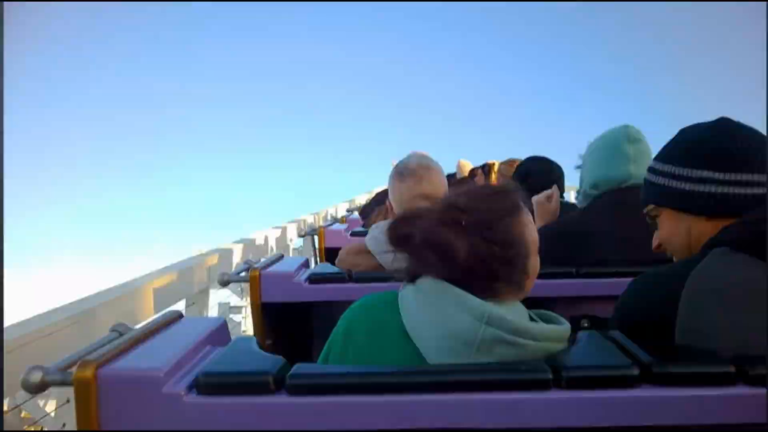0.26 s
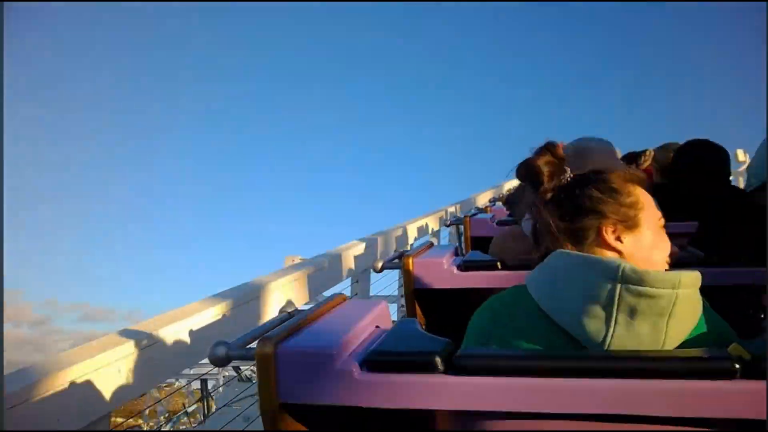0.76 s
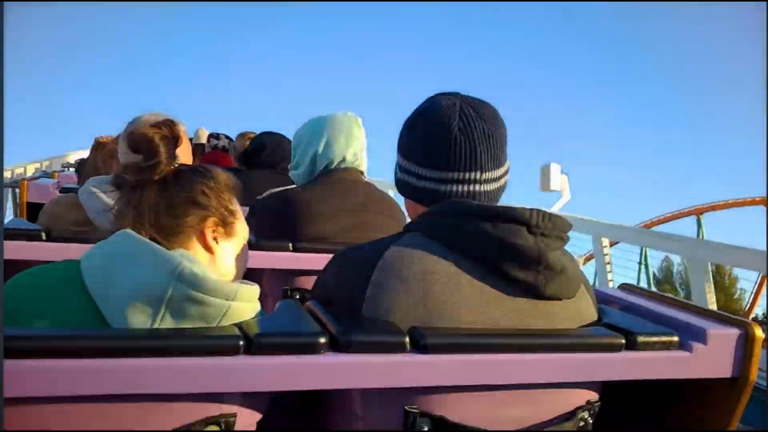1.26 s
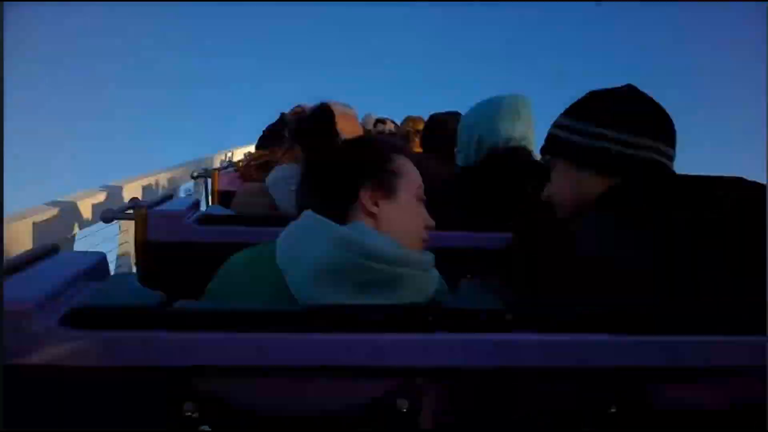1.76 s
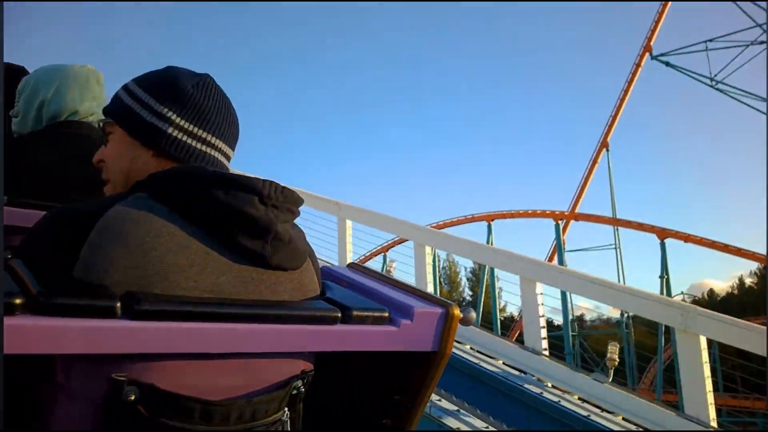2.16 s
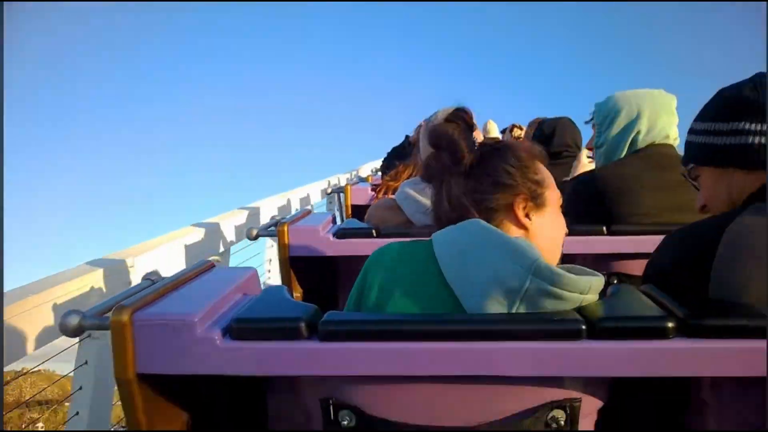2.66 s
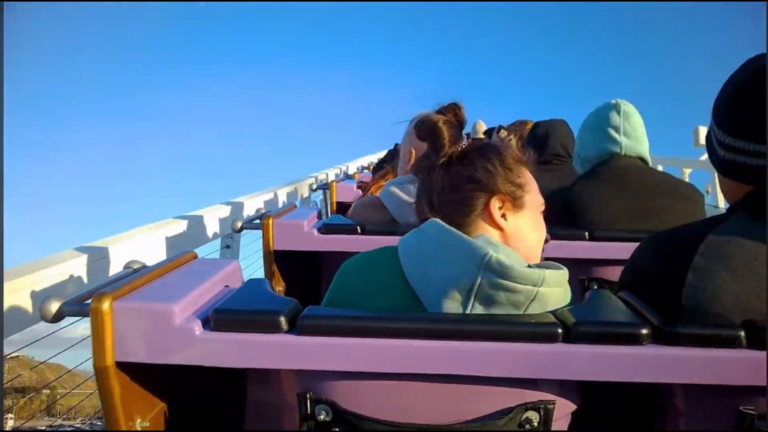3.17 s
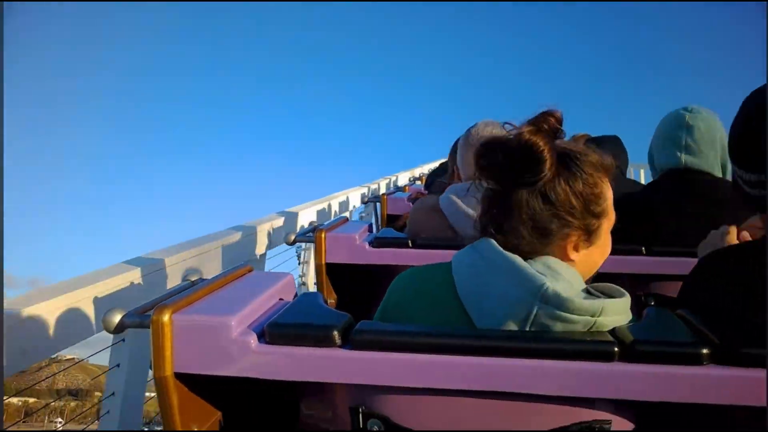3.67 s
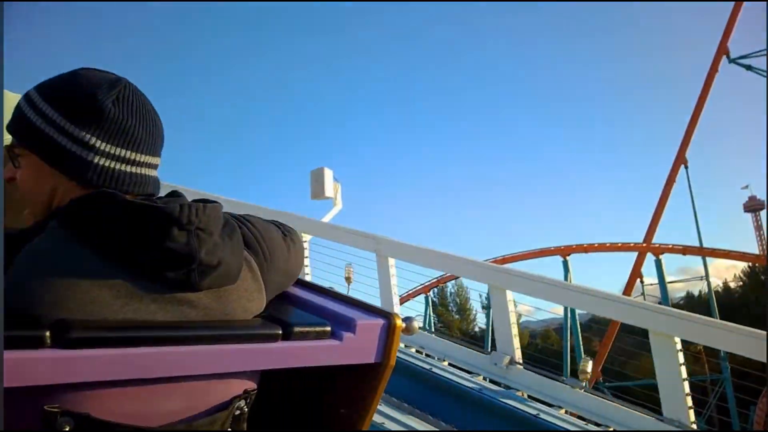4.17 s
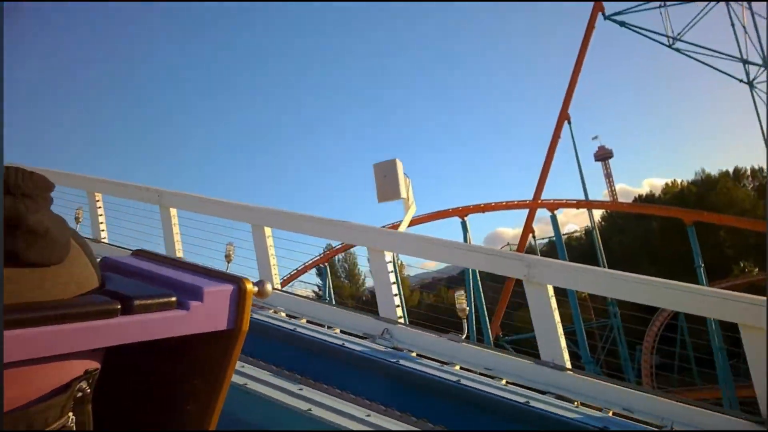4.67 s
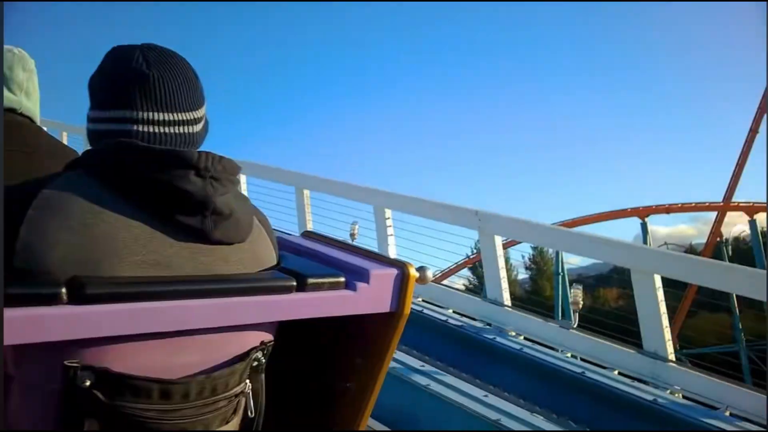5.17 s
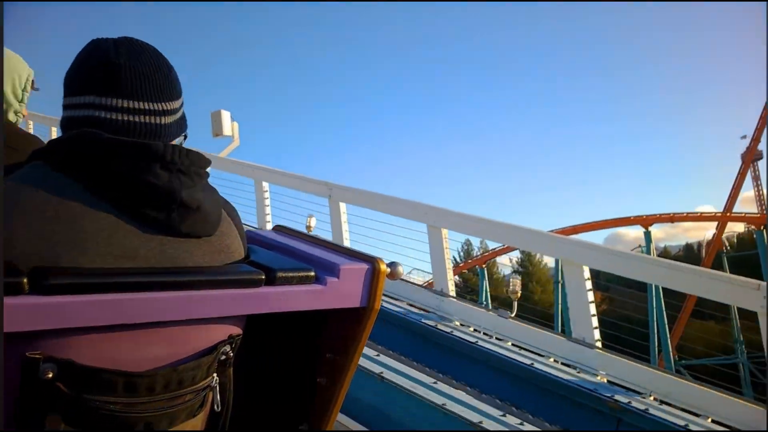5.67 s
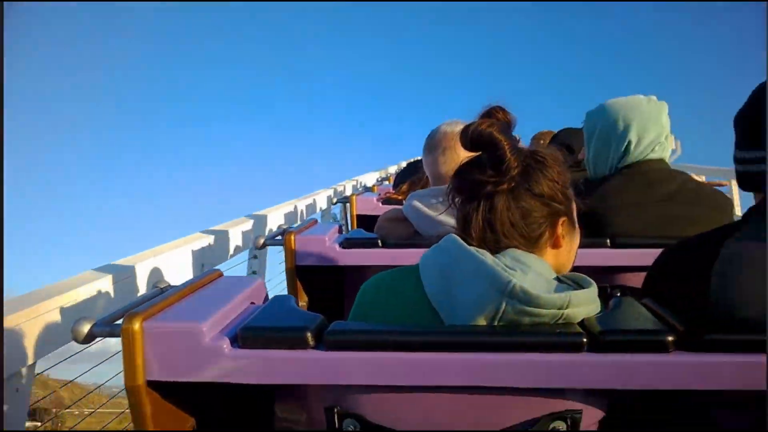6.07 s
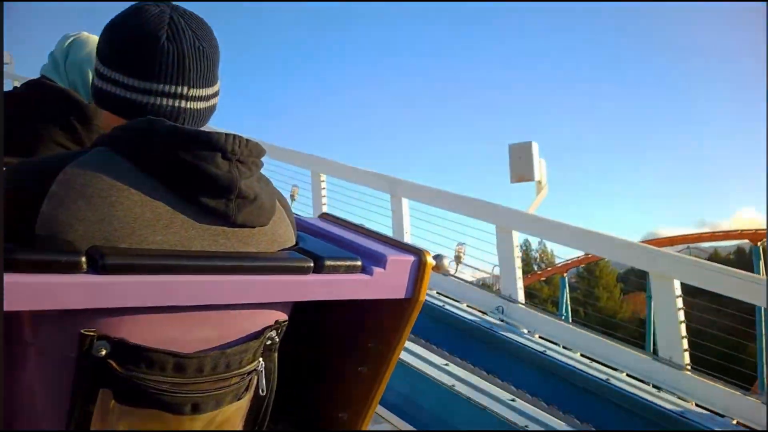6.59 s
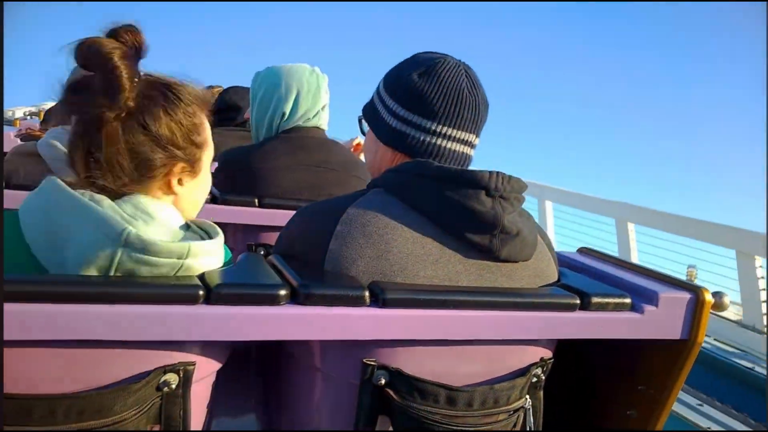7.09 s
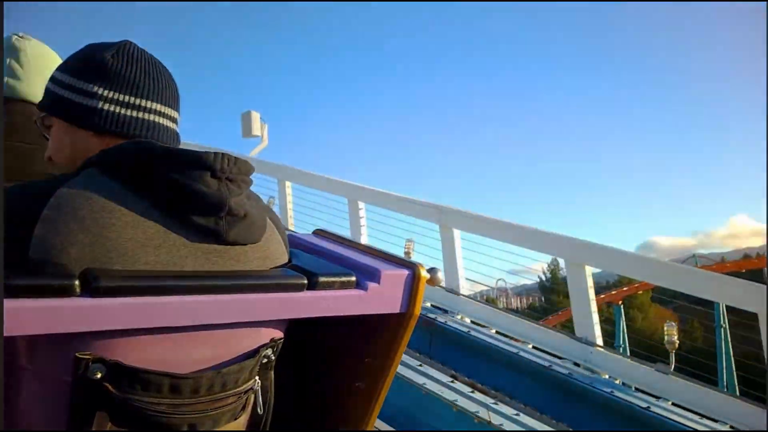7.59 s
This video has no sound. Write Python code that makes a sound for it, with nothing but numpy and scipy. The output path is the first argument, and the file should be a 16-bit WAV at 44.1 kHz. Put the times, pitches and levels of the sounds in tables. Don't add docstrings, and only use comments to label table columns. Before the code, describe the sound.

Harsh bright ratcheting of steel on steel as a coaster train climbs, irregular at first, later even and rapid, with tiny rubber squeaks.

```python
import sys
import numpy as np
from scipy import signal
from scipy.io import wavfile
from scipy.ndimage import uniform_filter1d

SR = 44100
rng = np.random.default_rng(int(sys.argv[2]) if len(sys.argv) > 2 else 0)


def waveform_to_disk(signal):
    frames = np.transpose(np.atleast_2d(signal))
    scaled = np.clip(frames, -1, 1) * 32767
    samples = np.round(scaled).astype(np.int16)
    wavfile.write(sys.argv[1], SR, samples)


def field_ratio(decibels):
    return 10 ** (np.asarray(decibels, dtype=float) / 20)


N = 345744

LOCKED_S, TEETH_PER_S, LOCKED_COUNT = 4.6933, 46.545, 147

# frequency in Hz, level in dB per Hz.
STEEL_COLOUR = [(500, -12), (707, -7), (1410, -4.5), (1900, -3.5), (2780, -5), (3250, -3.5), (6490, -3.5),
                (7200, -3), (8710, -2), (9840, -4.5), (11500, -14.5), (13100, -14.5), (16500, -5.5)]
# centre in Hz, width in Hz, height in dB.
PLATE_RESONANCES = [(2070, 490, 1), (2476, 155, 4.1), (3200, 810, 5.2), (4166, 220, 6.4), (4760, 190, 4.6),
                    (5160, 170, 4.2), (5630, 210, 3.2), (6300, 210, 3.7), (6540, 260, 3.3),
                    (8600, 200, 1.2), (8980, 150, 4.9), (9440, 150, 2.4), (9830, 220, 3.3),
                    (10720, 160, 2.9), (11060, 150, 4.8), (12000, 310, 4), (12900, 340, 3.4),
                    (14000, 310, 2.4), (16800, 160, 1.2)]
# frequency in Hz, time to fade by 60 dB in seconds.
RING_TIME = [(300, 0.037), (1000, 0.16), (2500, 0.12), (5000, 0.034), (9000, 0.036), (15000, 0.03)]
# frequency in Hz, time in seconds.
RATTLE_RISE_TIME = [(500, 0.002), (2000, 0.0031), (4000, 0.00044), (7000, 0.00039), (15000, 0.00037)]
# frequency in Hz, level in dB.
CONTACT_TICK = [(1000, 7.5), (3000, 9), (6000, -4.5), (9000, 26), (15000, 6)]

# time in seconds, level in dB.
ROAR_LEVEL = [(0.0, -18.5), (0.8, -23.5), (1.3, -20.5), (1.6, -21.5), (2.4, -24), (3.2, -21.5), (3.7, -22),
              (4.3, -20.5), (4.5, -26), (4.75, -20.5), (5.3, -20.5), (6.0, -18), (7.84, -19)]
# frequency in Hz, level in dB per Hz.
ROAR_COLOUR = [(500, -2), (700, -4), (1440, -7.5), (1850, 2.5), (2770, -18), (3210, -0.4), (6460, -5.5),
               (8870, -6), (11700, -18), (16500, -33)]
# centre in Hz, width in Hz.
RAIL_RESONANCES = [(1920, 140), (3300, 810)]

# start in seconds, number of strikes,
# speeding up (-0.5 to 0.5), long-short limp (-0.4 to 0.4).
BOUNCING_RUNS = [(0.0, 4, -0.5, 0.35), (0.0898, 3, -0.45, 0.3), (0.1696, 3, -0.3, 0.05),
                 (0.2439, 10, 0.3, 0), (0.4555, 3, 0.45, 0), (0.5068, 11, -0.35, -0.2),
                 (0.7168, 5, 0, -0.05), (0.858, 7, 0.15, 0), (1.0257, 4, -0.5, 0.2), (1.096, 5, -0.5, 0),
                 (1.192, 7, 0.15, 0), (1.3844, 4, -0.45, 0.25), (1.4741, 4, 0.5, -0.05),
                 (1.556, 4, -0.5, -0.05), (1.6368, 6, 0, -0.1), (1.763, 7, -0.45, 0),
                 (1.9027, 6, -0.4, 0.15), (2.0294, 3, 0.45, -0.25), (2.0828, 5, 0.4, -0.05),
                 (2.1681, 4, -0.15, -0.05), (2.2379, 8, -0.1, 0), (2.4474, 4, 0, 0.05),
                 (2.5412, 6, -0.4, -0.1), (2.6714, 7, 0.05, 0.1), (2.8156, 6, 0.45, -0.05),
                 (2.9393, 4, 0.5, -0.2), (3.0246, 7, 0.1, 0.05), (3.1932, 5, 0.2, 0.2),
                 (3.314, 4, -0.45, -0.15), (3.3788, 4, 0.25, 0)]
# start in seconds, number of strikes,
# speeding up, limp.
LEAPING_RUNS = [(3.4643, 2, 0, 0.1), (3.534, 4, 0.25, -0.05), (3.6238, 5, 0.1, -0.1), (3.7724, 4, -0.1, 0),
                (3.8597, 3, 0.05, 0.05), (3.9502, 2, 0, 0.4), (4.0119, 5, 0.1, 0.05), (4.168, 3, 0.15, 0),
                (4.2628, 2, 0, 0.05), (4.3242, 2, 0, 0), (4.3606, 3, 0.1, 0.35), (4.4229, 2, 0, 0),
                (4.4853, 5, 0.1, 0.15), (4.623, 3, 0.2, 0)]
# time in seconds, rebound level in dB.
REBOUND_LEVEL = [(0.0, -19), (0.9, -21), (1.25, -15.5), (1.42, -25), (2.4, -19.5), (3.1, -19), (3.9, -18),
                 (4.1, -16), (4.45, -24.5)]

# start in seconds, length in seconds, from Hz, to Hz, level in dB.
THIN_SQUEAKS = [(2.222, .04, 1750, 1920, -30), (2.247, .019, 3760, 3650, -26),
                (2.28, .022, 3750, 2950, -26), (2.777, .014, 1750, 2020, -28),
                (2.79, .04, 2060, 1960, -28.5), (2.798, .034, 3340, 3220, -26.5),
                (5.945, .04, 3100, 3420, -28), (4.092, .017, 7300, 9000, -28),
                (4.178, .012, 8000, 9200, -28), (4.211, .015, 9700, 9900, -28),
                (4.256, .03, 8500, 8300, -29)]
# start in seconds, length in seconds, from Hz, to Hz, level in dB.
REEDY_SQUEAKS = [
    (1.306, .038, 1780, 2070, -26),
    (3.41, .038, 1330, 1920, -26.5),
]
# start in seconds, length in
# seconds, from Hz, to Hz, level in dB.
BRIGHTER_SQUEAK = [
    (2.83, .027, 3220, 2600, -26),
]
# start in seconds, length in seconds, from Hz, to Hz, level in dB.
STRAIGHT_SQUEAK = [
    (4.759, .057, 740, 1190, -25.5),
]

# time in seconds, facing (1 car, -1 open air),
# leaning over the rail (0 to 1).
MIC_FACING = [
    (0.0, 1, 0),
    (0.7, 1, 0.21),
    (1.3, 0.27, 0.73),
    (2.8, 0.77, 0.94),
    (4.3, 0.15, 0.26),
    (5.2, -0.36, 0.28),
    (6.4, -1, 0),
    (7.1, -0.77, 0.55),
    (7.84, -0.79, 1),
]


def evened(x):
    return x / np.sqrt(np.mean(x ** 2) + 1e-20)


def read(points, hz):
    f, value = np.transpose(points)
    return np.interp(np.log(hz + 1), np.log(f + 1), value)


def bump(hz, centre_hz, width_hz):
    return 1 / (1 + (2 * (hz - centre_hz) / width_hz) ** 2)


def rings_db(hz):
    return sum(db * bump(hz, f, width) for f, width, db in PLATE_RESONANCES)


def coloured(x, gain_db):
    hz = np.abs(np.fft.fftfreq(4096, 1 / SR))
    log_gain = np.log(field_ratio(np.maximum(gain_db(hz), -100)))
    taps = np.fft.ifft(np.exp(np.conj(signal.hilbert(log_gain)))).real[:2048]
    return signal.oaconvolve(x, taps / np.linalg.norm(taps))[:N]


def roar():
    frames, hz = N // 128 + 5, np.fft.rfftfreq(512, 1 / SR)
    a, b, patches = rng.standard_normal((frames, 257, 3)).T
    patches = evened(uniform_filter1d(uniform_filter1d(patches, 5, 0), 12, 1))
    flutter = evened(uniform_filter1d(rng.standard_normal(frames), 4))
    colour_db = (read(ROAR_COLOUR, hz) + rings_db(hz))[:, None]
    z = (a + 1j * b) * field_ratio(colour_db + 1.3 * patches + 1.65 * flutter)
    wash = evened(signal.istft(z, nperseg=512, noverlap=384)[1][:N])
    level_db = np.interp(np.arange(N) / SR, *np.transpose(ROAR_LEVEL)) - 4.5
    return wash * field_ratio(level_db)


def squeaks():
    out = np.zeros(N)
    # squeaks, levels of tones 1-3 in dB, how much the glide flattens near its top
    kinds = [(THIN_SQUEAKS, (2, -15, -20), 1.7), (REEDY_SQUEAKS, (-11, 3, 0.5), 1.7),
             (BRIGHTER_SQUEAK, (2, -2, -20), 1.7), (STRAIGHT_SQUEAK, (-7.5, 2, -4), 1.25)]
    ends_db = -2.5
    for rows, tones_db, bow in kinds:
        for start, length, from_hz, to_hz, db in rows:
            u = np.linspace(0, 1, round(length * SR))
            off_top = u if from_hz > to_hz else 1 - u
            hz = max(from_hz, to_hz) - abs(from_hz - to_hz) * off_top ** bow
            turn = 2 * np.pi * np.cumsum(hz) / SR
            tone = sum(field_ratio(d) * np.sin((k + 1) * turn) for k, d in enumerate(tones_db))
            swell = field_ratio(db + ends_db * (2 * u - 1) ** 2) * signal.windows.tukey(len(u), .3)
            out[round(start * SR):][:len(u)] += np.sqrt(2) * tone * swell
    return out


def loose_strike_times():
    rows = BOUNCING_RUNS + LEAPING_RUNS
    ends = [row[0] for row in rows[1:]] + [LOCKED_S]
    out = []
    for (start, count, bend, limp), end in zip(rows, ends):
        k = np.arange(count)
        u = (k + limp * (k % 2)) / count
        out.append(start + (end - start) * (u + bend * u * (1 - u)))
    return np.concatenate(out)


def locked_strikes():
    late, hard = rng.standard_normal((LOCKED_COUNT, 2)).T
    s = LOCKED_S + np.arange(LOCKED_COUNT) / TEETH_PER_S + 0.00047 * late
    sway_s, sway_top_s = 1.23, 6.05
    sway_db = 0.3 * np.cos(2 * np.pi * (s - sway_top_s) / sway_s)
    return s, -10 + sway_db + 0.15 * hard


def strikes():
    locked_s, locked_db = locked_strikes()
    s = loose_strike_times()
    gap = np.diff(s, prepend=-1 / TEETH_PER_S)
    hard, soft, when = rng.standard_normal((len(s), 3)).T
    doublings = np.log2(gap * TEETH_PER_S)
    db = -9 + 2 * doublings + 0.5 * hard
    rebound_db = np.interp(s, *np.transpose(REBOUND_LEVEL)) + 4.5 * np.tanh(soft)
    rebound_s = np.abs(s - gap * (.55 + .13 * np.tanh(when)))
    s, db = np.r_[s, rebound_s, locked_s], np.r_[db, rebound_db, locked_db]
    lead_s = .0052 - .006 * np.r_[doublings, doublings, 0 * locked_s].clip(0)
    late, weak = rng.random((len(s), 2)).T
    graze_s = np.abs(s - lead_s + .009 * late)
    graze_db = db - 3.5 - 8.5 * weak
    return np.r_[s, graze_s], field_ratio(np.r_[db, graze_db])


def steel_body(count):
    hz, t, z = signal.stft(rng.standard_normal((count, 6000)), SR, nperseg=64)
    fade_db = -60 * t / read(RING_TIME, hz)[:, None]
    body = signal.istft(z * field_ratio(fade_db), SR, nperseg=64)[1]
    return body / np.linalg.norm(body, axis=1, keepdims=True)


def ringing(s, blow, spots):
    t = np.arange(800) / SR
    bounce = (1 - np.exp(-t / 0.00051)) * (3.7 * np.exp(-t / 0.0011) + 1 / (1 + (t / 0.0047) ** 4))
    scrape = rng.standard_normal(N)
    out = np.zeros(N)
    for k, body in enumerate(steel_body(count=spots)):
        at = np.round((s[k::spots] + 0.00068) * SR).astype(int)
        blows = np.bincount(at, blow[k::spots], N)[:N]
        push = signal.oaconvolve(blows, bounce)[:N] * scrape
        out += signal.oaconvolve(push, body)[:N]
    return out


def rattle(s, blow):
    frames, hz = N // 16 + 5, np.fft.rfftfreq(64, 1 / SR)
    t = np.arange(200) * 16 / SR
    build = 1 - np.exp(-t / read(RATTLE_RISE_TIME, hz)[:, None])
    hold_s = .004
    decay = field_ratio(-120 * np.maximum(t - hold_s, 0) / (1.75 * read(RING_TIME, hz)[:, None]))
    tick = field_ratio(2 * read(CONTACT_TICK, hz))[:, None] * np.exp(-t / 0.0029)
    at = np.round((s + 0.00097) * SR / 16).astype(int)
    blows = np.bincount(at, blow ** 2, frames)[None, :frames]
    power = np.abs(signal.oaconvolve(blows, build ** 2 * decay + tick, axes=1)[:, :frames])
    power /= power.mean(1, keepdims=True)
    a, b, grain = rng.standard_normal((frames, 33, 3)).T
    grain = evened(uniform_filter1d(uniform_filter1d(grain, 2, 0), 14, 1))
    power *= field_ratio(2 * 1.5 * grain)
    return signal.istft((a + 1j * b) * np.sqrt(power), nperseg=64, noverlap=48)[1][:N]


def pawl(spots):
    s, blow = strikes()
    steel = field_ratio(-7.5) * evened(ringing(s, blow, spots)) + field_ratio(-1.0) * evened(rattle(s, blow))
    return field_ratio(-17.5) * evened(coloured(steel, lambda hz: read(STEEL_COLOUR, hz) + rings_db(hz)))


def turned(x):
    hz, t, z = signal.stft(x, SR, nperseg=512)
    hz = hz[:, None]
    lower, upper = [bump(hz, *row) for row in RAIL_RESONANCES]
    car_db = 2.5 / (1 + (hz / 1550) ** 6) - 0.8 / (1 + (10500 / (hz + 1)) ** 8)
    car_db += -1.3 * lower + 1.2 * upper
    rail_db = 3 * lower - .6 * upper
    s, facing, rail = np.transpose(MIC_FACING)
    drift = uniform_filter1d(uniform_filter1d(rng.standard_normal(z.T.shape), 70, 0), 4, 1).T
    gain_db = car_db * np.interp(t, s, facing) + rail_db * np.interp(t, s, rail) + .7 * evened(drift)
    return signal.istft(z * field_ratio(gain_db), SR, nperseg=512)[1][:N]


def scene():
    return (turned(pawl(spots=8) + roar()) + squeaks())[None]


def top_cut(x):
    return signal.sosfilt(signal.butter(12, 16820, fs=SR, output="sos"), x)


def record(dry):
    cut = signal.sosfilt(signal.butter(7, 650 / (SR / 2), "high", output="sos"), dry)
    leak = signal.lfilter(*signal.butter(1, 250 / (SR / 2), "high"), dry)
    cut = 0.84 * cut + 0.13 * leak
    knee = 3.5
    limited = cut / (1 + np.abs(cut / .5) ** knee) ** (1 / knee)
    spill = signal.lfilter(*signal.butter(2, 650 / (SR / 2)), limited - cut + 0.19 * limited ** 2)
    spill -= signal.lfilter(*signal.butter(1, 300 / (SR / 2)), spill)
    spill = signal.lfilter(*signal.butter(1, 25 / (SR / 2), "high"), spill)
    edge = signal.firwin(801, 15800, window=("kaiser", 9), fs=SR)[None]
    mix = signal.oaconvolve(limited + .9 * spill, edge, "same")
    return top_cut(mix)


dry = scene()
out = record(dry)
waveform_to_disk(out)
```